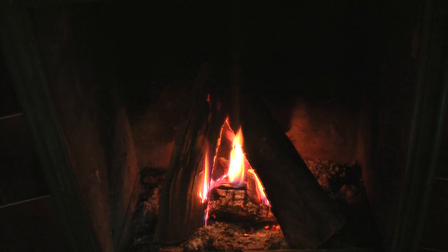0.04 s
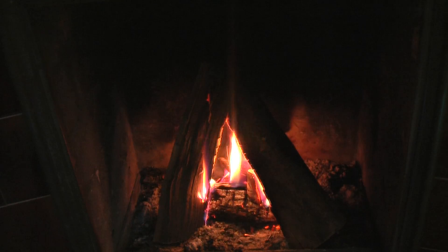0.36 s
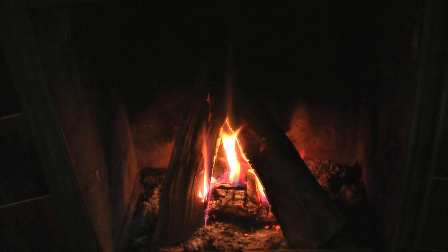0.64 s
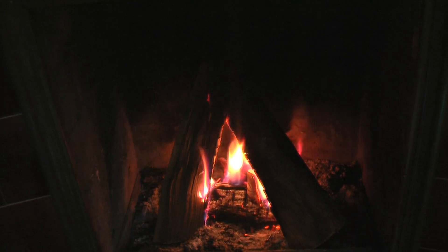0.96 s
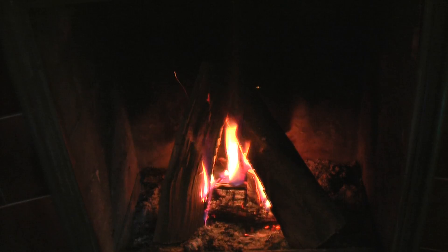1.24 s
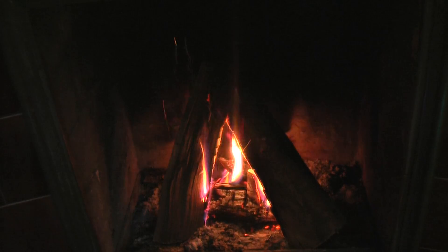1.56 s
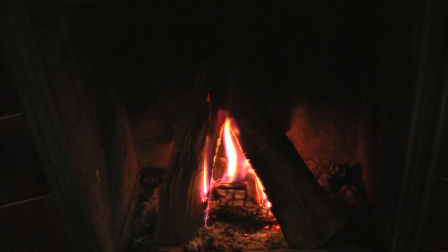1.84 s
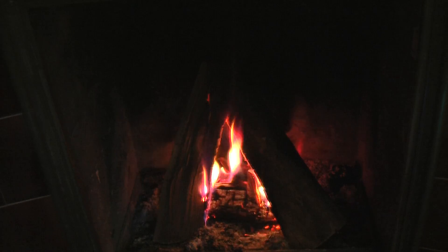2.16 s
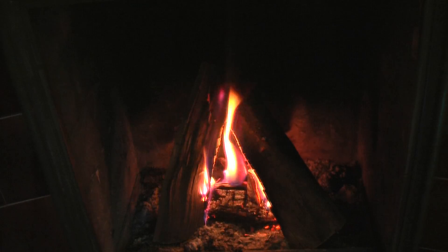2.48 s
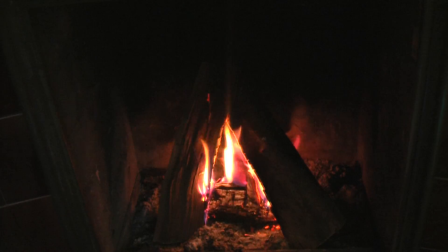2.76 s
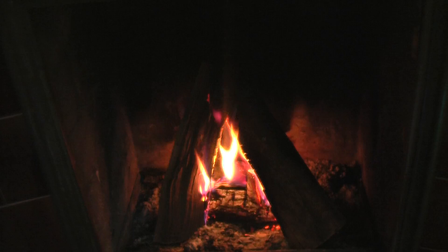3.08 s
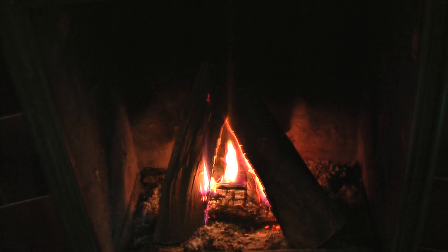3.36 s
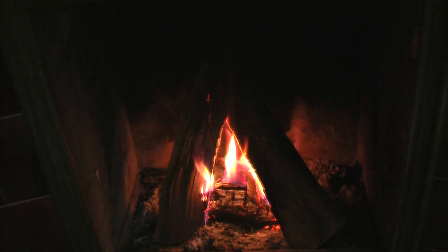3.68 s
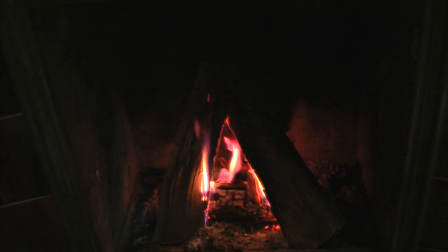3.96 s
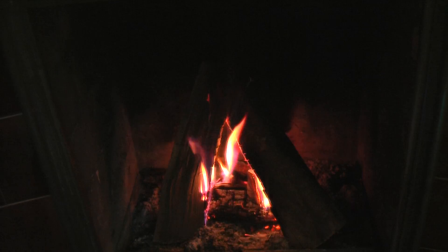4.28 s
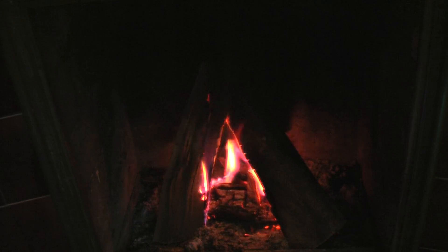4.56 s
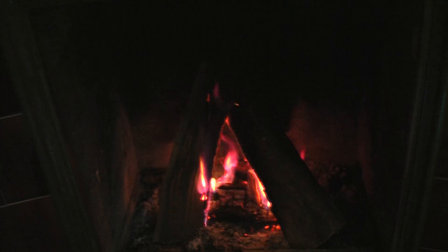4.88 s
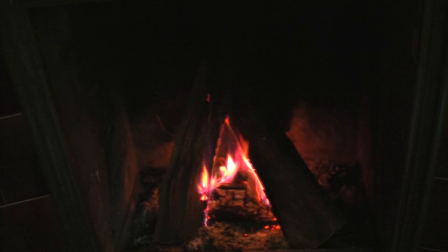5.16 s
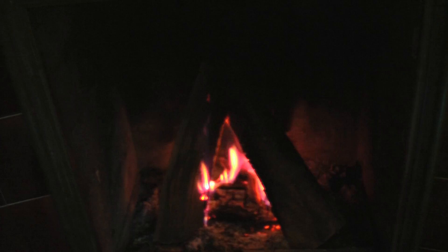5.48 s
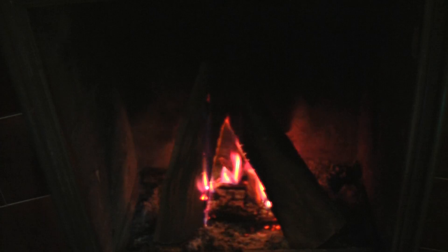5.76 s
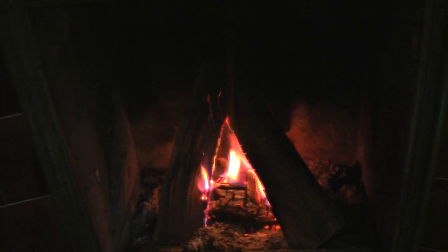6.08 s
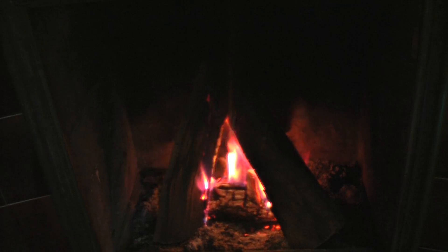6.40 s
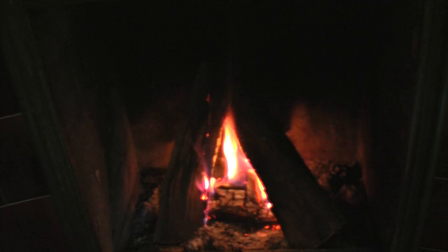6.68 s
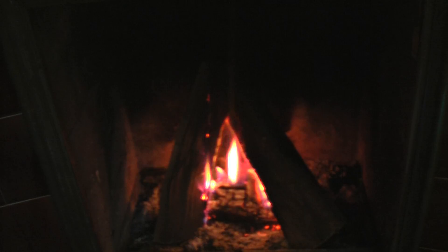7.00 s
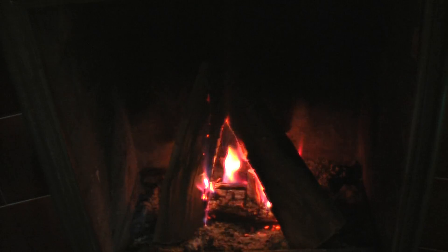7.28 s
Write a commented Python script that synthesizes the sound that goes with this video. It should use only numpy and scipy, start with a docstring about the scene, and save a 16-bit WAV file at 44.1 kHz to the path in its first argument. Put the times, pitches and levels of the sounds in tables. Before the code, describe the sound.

A close wood fire crackles unevenly in an indoor hearth, starting with thin, high spits of steam. Dry pops, small charcoal ticks and short puffs of hiss follow, with a dull knock early and another just past halfway as the logs settle. After a quieter stretch the snapping and sizzling pick up again. A soft low draught runs throughout, and an engine far outside hums faintly in the second half.

```python
"""A quiet room with logs burning in an open brick fireplace.
Pockets of gas swell and burst in the wood, charcoal ticks, and cracks hiss between the pops.
Steam squeaks and whistles out of tiny pores; now and then a log thumps as it shifts.
Underneath lie the murmur of the draught, two faint tones and an engine droning far outside."""
import sys
import numpy as np
from scipy import signal
from scipy.fft import rfft, irfft, next_fast_len
from scipy.io import wavfile

SR = 44100
rng = np.random.default_rng(int(sys.argv[2]) if len(sys.argv) > 2 else 0)


def log_audio(samples):
    """Write samples as a 16-bit WAV file to the path given in sys.argv[1]."""
    # one column per channel
    frames = np.atleast_2d(samples).T
    # limit to full scale, then quantise
    limited = np.clip(frames, -1, 1)
    pcm = np.round(limited * 32767).astype(np.int16)
    wavfile.write(sys.argv[1], SR, pcm)


N = 323694
TIME = np.arange(N) / SR

# bursting gas pockets; the last three columns are relative to the level:
# (time [s], level [dB], nominal cavity pitch [Hz], low knock [dB], high snap [dB], lead-in hiss [dB])
GAS_POPS = [(0.2946, -35.5, 2000, -5.5, -25, -23), (0.312, -45, 2650, -0.5, -7, -10),
            (0.5885, -41.5, 1930, -5, -2, -24), (0.7201, -38, 1690, -24, -13, -32),
            (1.1275, -42.5, 1140, -3, -11, -24), (1.1552, -50.5, 2100, 3.5, -4, 1),
            (1.1854, -40, 1590, -13, -9, -21), (1.2046, -50.5, 1600, -4, 4, 8.5),
            (1.212, -43.5, 3770, -3, -8, -9), (1.2383, -52, 1250, -22, 2, 10),
            (1.2892, -37, 1070, 5, -2, -33), (1.5056, -40.5, 4600, -7, -28, -3.5),
            (1.5151, -39, 1110, -4.5, -27, -27), (1.5217, -43, 3870, -4, -9, 4.5),
            (1.5447, -47.5, 1570, 1, -26, -15), (1.5588, -41, 4300, -5, -19, -8),
            (1.5638, -36, 4400, -18, -21, -18), (1.5888, -37, 3950, -10, -7.5, -6),
            (1.741, -37.5, 2670, -16, -15, -17), (1.7419, -34.5, 4500, -14, -19, -7),
            (1.803, -42.5, 3580, -5, -18, -13), (1.8147, -36, 4030, -9.5, -19, -6.5),
            (1.857, -41.5, 3720, -11, -28, 2), (1.8836, -35.5, 2210, -21, -12, -6),
            (1.895, -32.5, 1870, -18, -16, -6), (2.026, -26, 2430, -14.5, -13.5, -40),
            (2.4135, -44.5, 3640, -9.5, -30, 4), (2.796, -50, 2620, -29, -21, -12),
            (2.8048, -41.5, 1930, -11, -26, -14), (2.8167, -54, 1800, 6.5, -10, -1),
            (3.1416, -56, 4430, -3, -1, -20), (3.2447, -45, 2200, -4, -19, -8),
            (3.2615, -45, 1460, -3, -11, -6), (3.351, -58.5, 2580, -12, 0, 2),
            (3.3591, -54, 3130, 0.5, -5, 3.5), (3.4079, -63, 4230, -15, 8, -17),
            (3.634, -49, 2120, 0.5, -25, -0.5), (3.7805, -52, 2570, 2.5, -9, -1.5),
            (3.828, -64, 1400, 5, 0, -16), (3.86, -65, 3200, -9, 1, -17), (3.979, -58, 2300, -11, -5, -1),
            (3.9983, -50.5, 2270, -1, -14, -2), (4.043, -51, 2000, -6, -16, -7),
            (4.066, -53, 3300, -4, -10, -3), (4.085, -54, 3200, -6, -7, -5),
            (4.105, -48.5, 2980, -8, -4, -4), (4.1394, -45, 1400, -1.5, -10, -17),
            (4.3437, -34, 2780, -7, -12, -3.5), (4.3448, -30, 4750, -16, -11.5, -9),
            (4.51, -64, 1700, 11.5, -14, -12), (4.7561, -62.5, 4690, -4, 5, -16),
            (4.7736, -54.5, 1250, -1, -6, -11), (4.8456, -58.5, 3300, -13, -6, -10),
            (4.9135, -48, 1490, 0.5, -25, -30), (4.949, -47, 1100, -2.5, -4.5, -1),
            (5.0196, -41, 1270, -6, -8, -33), (5.0493, -37, 5530, -8.5, 1.5, -35),
            (5.177, -38, 1210, -6, -13, -12), (5.5559, -43.5, 1370, -11, -4, -1),
            (5.567, -37, 2050, -10, -3, -9), (5.5838, -48, 1940, -15, -10, 10.5),
            (5.8545, -33, 1780, -12, -11, -15), (5.8559, -27, 2350, -22, -12, -25),
            (6.0447, -39.5, 1990, -8.5, -3, -22), (6.0499, -42, 2300, -4.5, 2, -30),
            (6.353, -54, 4500, -14, -4, -10), (6.4114, -53, 4360, -8, -9, -7),
            (6.8434, -50.5, 4360, -18, -3, -4), (7.0931, -30, 5610, -9.5, -4, -37)]
# steam squeaks: (time [s], level [dB], pitch [Hz], decay [s])
STEAM_SQUEAKS = [(0.0835, -36.5, 9500, 0.0019), (0.1445, -38, 9400, 0.0019), (0.1776, -40, 9470, 0.0021),
                 (0.2192, -19, 9550, 0.0023), (0.233, -22.5, 9400, 0.0017), (0.235, -21, 9300, 0.0011),
                 (0.2444, -29, 9550, 0.0013), (0.2735, -19, 9550, 0.0026), (0.3023, -37, 9700, 0.003),
                 (0.325, -31.5, 9700, 0.0016), (0.3306, -34, 10100, 0.0031), (0.34, -38, 9300, 0.0029),
                 (0.3798, -26, 9500, 0.002), (0.4445, -43.5, 9870, 0.0054), (0.69, -27, 9430, 0.0029),
                 (0.7072, -28.5, 9450, 0.0035), (0.7354, -60, 9600, 0.0052), (0.783, -42.5, 9450, 0.0048),
                 (0.8157, -47.5, 9540, 0.0092), (0.894, -45, 9100, 0.0029), (0.912, -36, 9600, 0.0024),
                 (0.956, -43, 10620, 0.0024), (0.976, -46, 10500, 0.0036), (6.091, -34.5, 9460, 0.0056),
                 (6.0999, -42, 9430, 0.0023), (6.1257, -33, 9940, 0.0057), (6.171, -35, 9780, 0.0078),
                 (6.1867, -48, 9810, 0.0034), (6.96, -38.5, 9400, 0.0021), (7.1932, -29.5, 9300, 0.0032),
                 (7.2814, -29, 9390, 0.0015), (7.308, -30.5, 9500, 0.0046), (7.3176, -40, 9300, 0.0041)]
# shifting logs: (time [s], level [dB], pitch [Hz], decay [s], room send [dB])
LOG_THUMPS = [(.588, -32, 326, 0.0041, -10), (1.289, -16.5, 297, 0.0022, -3.5),
              (2.026, -32.5, 497, 0.0005, 8), (2.448, -45, 296, 0.0038, 1.5), (3.078, -47, 262, 0.006, -5),
              (3.309, -46.5, 250, 0.0062, -20), (3.509, -44.5, 195, 0.0079, -8),
              (4.139, -44, 258, 0.0015, -2), (4.346, -25.5, 450, 0.0038, -11),
              (4.351, -25.5, 69.6, 0.0065, -20), (4.387, -20.5, 63, 0.0037, -23),
              (4.688, -44, 225, 0.016, -6.5), (4.717, -51.5, 260, 0.0069, -6),
              (7.093, -35, 573, 0.00093, 5.5)]
# jets from cracks:
# (time fully open [s], rise [s], hold [s], fall [s], blowing [dB], hiss [dB], fizz [dB], hiss pitch [Hz])
GAS_JETS = [(0.0, .01, 0.022, 0.13, -57, -54.5, -52.5, 4900),
            (.52, 0.032, 0.078, 0.01, -54.5, -51.5, -54, 4500),
            (1.191, 0.017, 0.02, 0.016, -53.5, -55, -59, 4450),
            (1.287, 0.0092, 0.025, 0.063, -63, -55, -58, 4600),
            (1.552, .02, 0.081, 0.048, -65, -71, -65, 4300), (1.89, .02, .01, 0.051, -76, -58, -59, 4100),
            (2.031, 0.0018, 0.054, 0.072, -50.5, -40.5, -58, 4350),
            (2.404, 0.025, 0.06, 0.027, -61, -60.5, -81, 3500),
            (2.794, 0.012, 0.014, 0.027, -53, -54, -68, 3280),
            (3.24, 0.017, 0.016, 0.01, -61, -62, -80, 3600),
            (3.752, .02, 0.013, 0.011, -67.5, -70, -87, 3900),
            (4.043, 0.048, 0.052, 0.038, -64, -60, -74, 4220),
            (4.345, 0.051, 0.029, 0.086, -58, -63, -67.5, 4930),
            (4.944, .006, .015, 0.036, -58, -57, -63, 4800),
            (5.057, .006, 0.057, 0.027, -62, -54.5, -58.5, 5000),
            (5.143, .015, 0.0072, 0.0057, -57, -49.5, -51, 5000),
            (5.362, 0.026, 0.018, .035, -49, -56, -57.5, 4840),
            (5.502, 0.018, .01, 0.019, -61, -49.5, -49, 4970),
            (5.621, 0.034, 0.054, 0.072, -58.5, -55, -63, 3670),
            (5.765, 0.017, 0.067, .02, -78, -52.5, -55.5, 4870),
            (5.937, 0.015, 0.031, 0.032, -70, -58, -57.5, 4800),
            (6.064, 0.052, 0.02, 0.029, -68, -51, -79, 3470),
            (6.269, 0.09, 0.18, 0.055, -58, -60, -69, 4240),
            (6.359, 0.039, .02, 0.036, -76, -56, -62.5, 4400),
            (6.529, 0.014, 0.022, 0.023, -57.5, -55.5, -56.5, 5060),
            (6.667, .02, 0.015, 0.036, -63, -53.5, -58, 5870),
            (6.774, 0.034, .05, 0.012, -57.5, -54, -62.5, 6000),
            (7.099, 0.0035, 0.043, 0.072, -59, -51, -48, 5200)]
# envelope of the seeping gas: (time [s], blowing [dB], hiss [dB])
SEEP_LEVELS = [(0, -51.5, -50), (.35, -54.5, -53), (.75, -58, -56), (.9, -62, -69), (1.08, -58, -65.5),
               (1.22, -61.5, -58.5), (1.45, -76, -70), (2.0, -73, -72), (2.6, -87, -80.5),
               (4.6, -80.5, -85.5), (4.88, -77, -74), (5.05, -65.5, -70), (5.35, -60.5, -60),
               (5.7, -58.5, -56.5), (6.03, -61, -55.5), (6.17, -64.5, -67), (6.9, -65.5, -61),
               (7.34, -46.5, -44)]
# blows through one whistling pore: (time [s], length [s], level [dB])
PORE_WHISTLES = [(0.905, 0.051, -41.5), (0.961, 0.083, -46), (1.104, 0.048, -47)]
# engine speed: (time [s], firing rate [Hz])
ENGINE_RATE = [(2.6, 40.6), (3.3, 40.2), (4.2, 40.0), (4.6, 40), (5.2, 39.16), (5.8, 38.22), (6.1, 37.74),
               (7.3, 37.48)]
# engine fade: (time [s], level [dB])
ENGINE_FADE = [(2.5, -87), (3.3, -75), (4.0, -66.5), (4.7, -66.5), (5.5, -64.5), (6.05, -66), (6.45, -64.5),
               (7.3, -65.5)]
# engine harmonics: (order [x firing rate], level [dB])
ENGINE_HARMONICS = [(2, 0), (3, -0.5), (4, 0), (5, 0), (6, -3)]
# swells of single harmonics: (peak time [s], half width [s], order [x firing rate], boost [dB])
HARMONIC_SWELLS = [(4.87, 0.26, 4, 14), (5.25, 0.24, 3, 6), (5.553, 0.23, 6, 8), (6.371, .22, 6, 9.5),
                   (6.553, 0.38, 2, 10), (6.644, 0.16, 5, 7.5), (6.754, 0.39, 3, 11), (7.195, 0.53, 6, 9.5)]
# thin tones behind the fire: (pitch [Hz], level [dB])
BACKGROUND_TONES = [(2702, -88.5), (3919, -89)]
# reverb of the room: (frequency [Hz], time to fall by 60 dB [s])
ROOM_DECAY = [(100, 0.3), (400, 0.48), (1500, 0.35), (5000, 0.24), (10000, 0.21), (16000, 0.74)]

# tone colours: (frequency [Hz], level [dB])
CRACK_COLOUR = [(300, -20.5), (900, -5.5), (1800, -1), (3200, -4.5), (5000, -4.5), (6500, -9), (8000, -19),
                (16000, -8.5)]  # mid-range bite of splitting wood
KNOCK_COLOUR = [(40, -46), (130, 7), (300, 4), (600, 2), (900, 7), (1600, -35), (5000, -49)]  # low body of a pop
SNAP_COLOUR = [(3000, -45), (6500, -1.5), (8000, 6), (10000, 11), (13000, 10), (16500, 4.5)]  # bright edge of a pop
BLOWING_COLOUR = [(120, -50), (300, -8), (550, -4), (1000, 3), (1700, 3), (2400, 0.5), (3200, -5.5),
                  (6000, -44)]  # gas in wide cracks
HISS_COLOUR = [(1500, -32), (2500, 4.5), (3100, 1.5), (4200, -5), (5400, -3), (6400, 0.5), (7500, -13),
               (11000, -3.5)]  # gas in narrow cracks
FIZZ_COLOUR = [(4000, -5), (7000, -3), (8300, 0.5), (9600, 6.5), (11000, 2), (13000, 1.5), (16000, -3),
               (17000, -2.5)]  # gas in the finest cracks
DRAUGHT_COLOUR = [(15, -28), (28, -13), (40, -12), (50, -6), (65, -0.5), (160, -0.5), (240, -5.5),
                  (380, -8.5), (500, -16), (850, -17.5), (1700, -23.5), (4000, -32.5), (8000, -45),
                  (16500, -43)]  # flames and chimney
SPIT_COLOUR = [(6500, -56), (8500, -13), (9700, -3), (11000, 11), (13000, 1), (16000, -27)]
THUMP_COLOUR = [(30, 5), (100, 10), (300, 10), (750, 3), (1000, -1), (3000, -61)]
TICK_COLOUR = [(500, -23), (3000, -4), (16000, 11)]


def pops(overtone_ratio=2.086, glide_s=0.0086, swell_s=0.0034, leak_s=0.01, size=3000):
    """Gas leaks ever faster from a pocket; the wood cracks, and the cavity rings lower as it opens."""
    out, t = np.zeros(N), np.arange(size) / SR
    knock, snap = impulse(KNOCK_COLOUR), impulse(SNAP_COLOUR)
    for start, db, hz, knock_db, snap_db, leak_db in GAS_POPS:
        crack = lowpass(impulse(CRACK_COLOUR, hz, focus_db=3), 9500, order=2)
        phase = phase_of(hz * (0.25 + 0.817 * np.exp(-t / glide_s)))
        overtone = amp(-4 + read(CRACK_COLOUR, overtone_ratio * hz))  # wood swallows high overtones
        cavity = (np.sin(phase) + overtone * np.sin(overtone_ratio * phase)) * np.exp(-t / 0.0013)
        cavity = lowpass(cavity, 6800, order=4)
        add(out, start, amp(db - 2) * burst(crack, decay_s=0.0013, tearing=4.7))
        add(out, start, amp(db - 3) * burst(cavity, decay_s=0.00053, tearing=0.87))
        add(out, start, amp(db + knock_db - 1) * burst(knock, decay_s=0.0067, tearing=0.82))
        add(out, start, amp(db + snap_db - 1) * burst(snap, decay_s=0.0036, tearing=0.95))
        leak = signal.fftconvolve(rng.standard_normal(size), crack)[:size]
        leak *= (np.exp(-t / swell_s) + amp(-13) * np.exp(-t / leak_s))[::-1]  # swells into the pop
        add(out, start - size / SR, 0.3 * amp(db + leak_db - 1) * unit(leak))
    return out


def squeaks(upper_ratio=1.075, attack_s=0.00024, follow_s=0.021, spit_db=-11, size=2000):
    """A sap bubble opens a pore that rings at two pitches over a spit of steam; smaller ones follow."""
    out, t = np.zeros(N), np.arange(size) / SR
    spit_response = impulse(SPIT_COLOUR)
    for start, db, hz, decay in STEAM_SQUEAKS:
        upper_gain = amp(-9 + 1200 * (decay - 0.0064))  # stronger in pores that ring long
        followers = [(rng.uniform(0.26, 1) * follow_s, rng.normal(-15, 0.49), rng.normal(1.01, 0.0204))
                     for _ in range(3)]
        for delay, drop_db, detune in [(0.0011, 0, 1)] + followers:
            turns = hz * detune * t
            upper = upper_gain * np.sin(2 * np.pi * (upper_ratio * turns + rng.random()))
            tone = (np.sin(2 * np.pi * turns) + upper) * np.exp(-t / decay)
            spit = unit(signal.fftconvolve(rng.standard_normal(size), spit_response)[:size])
            squeak = tone + amp(spit_db) * spit * np.exp(-t / 0.0017)
            add(out, start + delay, amp(db + drop_db + 2) * squeak * (1 - np.exp(-t / attack_s)))
    return out


def thumps(push_gain=0.82, swing_gain=0.71, size=4000):
    """A log gives way with one heavily damped swing, and the room answers."""
    direct, send, t = np.zeros(N), np.zeros(N), np.arange(size) / SR
    thud = impulse(THUMP_COLOUR, size=2 * size)
    for start, db, hz, decay, send_db in LOG_THUMPS:
        push = lowpass(thud / thud.max(), min(3 * hz, 5000), order=1)  # heavier logs push more softly
        swing = np.sin(2 * np.pi * hz * t) * np.exp(-t / decay)
        low_cut = signal.butter(2, 0.39 * hz, "high", fs=SR)  # a log radiates little below its pitch
        thump = amp(db) * signal.lfilter(*low_cut, swing_gain * swing + push_gain * push)
        add(direct, start, thump)
        add(send, start, amp(send_db) * thump)
    return direct + room(send)


def gas(hiss_db=-1, fizz_db=3, flutter_db=1.5, flutter_hz=39, grain_db=1, grain_hz=500):
    """Seeping gas and jets flutter together, while blowing, hiss and fizz each sputter on their own."""
    blowing, hiss, fizz = [layer * amp(grain_db * wander(grain_hz)) for layer in seep() + jets()]
    return (blowing + amp(hiss_db) * hiss + amp(fizz_db) * fizz) * amp(flutter_db * wander(flutter_hz))


def jets(blow_hz=1990, fizz_power=1.3, size=32768):
    """A crack opens, blows for a moment and runs dry; its fizz grows and dies faster than the flow."""
    out, t = np.zeros((3, N)), (np.arange(size) - size // 4) / SR
    for open_s, rise, hold, fall, blow_db, hiss_db, fizz_db, hiss_hz in GAS_JETS:
        flow = np.exp(np.minimum(t, 0) / rise - np.maximum(t - hold, 0) / fall)
        envelopes = amp(blow_db) * flow, amp(hiss_db) * flow, amp(fizz_db) * flow ** fizz_power
        for layer, envelope, sound in zip(out, envelopes, vent(blow_hz, hiss_hz, size)):
            add(layer, open_s + t[0], (envelope * sound)[open_s + t >= 0])
    return out


def seep(fizz_db=-5.5, ember_db=-79.5):
    """Gas seeps from the logs, dies down and builds again; fizz follows the hiss over steady embers."""
    times, blow_db, hiss_db = np.transpose(SEEP_LEVELS)
    blowing, hiss = amp(np.interp(TIME, times, blow_db)), amp(np.interp(TIME, times, hiss_db))
    fizz = np.hypot(amp(fizz_db) * hiss, amp(ember_db))
    return np.array([blowing, hiss, fizz]) * vent(blow_hz=1666, hiss_hz=4600, size=N)


def vent(blow_hz, hiss_hz, size, top_hz=8500):
    """Gas blows, hisses and fizzes in wide, narrow and fine cracks; the first two resonate."""
    blow_tone = unit(resonate(noise(BLOWING_COLOUR, size), blow_hz, width_hz=1200))
    hiss_tone = unit(resonate(noise(HISS_COLOUR, size), hiss_hz, width_hz=2100))
    blowing = lowpass(noise(BLOWING_COLOUR, size) + 0.85 * blow_tone, top_hz, order=3)
    hiss = lowpass(noise(HISS_COLOUR, size) + hiss_tone, top_hz, order=3)
    return unit(blowing), unit(hiss), noise(FIZZ_COLOUR, size)


def whistles(pitch_hz=16200, waver_hz=45, sizzle_hz=9650, sizzle_db=-9):
    """A narrow pore sings in short, fading blows over a thin sizzle."""
    envelope = np.zeros(N)
    for start, length, db in PORE_WHISTLES:
        progress = np.linspace(0, 1, round(length * SR))
        add(envelope, start, amp(db) * np.minimum(progress * 10, 1) * (1 - progress))
    sizzle = unit(resonate(rng.standard_normal(N), sizzle_hz, width_hz=700))
    tone = np.sin(phase_of(pitch_hz + waver_hz * wander(rate_hz=150)))
    return envelope * (tone + amp(sizzle_db) * sizzle)


def ticks(per_s=28, level_db=-73, spread_db=3, spots=12):
    """Tiny splits in the charcoal, each spot with its own colour."""
    out = np.zeros(N)
    for hz in np.geomspace(3500, 14000, spots):
        strengths = amp(spread_db * np.minimum(rng.exponential(1, N), 3))
        triggers = rng.random(N) < per_s / spots / SR
        split = burst(impulse(TICK_COLOUR, hz, focus_db=11.5), decay_s=0.00043, tearing=1)
        out += signal.oaconvolve(strengths * triggers, split)[:N]
    return amp(level_db) * out


def draught(level_db=-62):
    """The low, steady murmur of flames and chimney."""
    return amp(level_db) * noise(DRAUGHT_COLOUR)


def engine(waver_db=1.9):
    """A far engine fades in and slowly sinks in pitch; its low harmonics swell in turn."""
    phase = phase_of(np.interp(TIME, *np.transpose(ENGINE_RATE)))
    fade_db = np.interp(TIME, *np.transpose(ENGINE_FADE))
    drone = np.zeros(N)
    for order, db in ENGINE_HARMONICS:
        swell_db = sum(boost * np.exp(-((TIME - peak_s) / width) ** 2)
                       for peak_s, width, swelling, boost in HARMONIC_SWELLS if swelling == order)
        gain = amp(fade_db + db + swell_db + waver_db * wander(rate_hz=3))
        drone += gain * np.sin(order * phase + 2 * np.pi * rng.random())
    return np.sqrt(2) * drone


def faint_tones(waver_db=3, drift_hz=6):
    """Thin wavering tones that peek through only when the fire is quiet."""
    out = np.zeros(N)
    for hz, db in BACKGROUND_TONES:
        gain = amp(db + waver_db * wander(rate_hz=4))
        out += gain * np.sin(phase_of(hz + drift_hz * wander(rate_hz=4)))
    return np.sqrt(2) * out


def firebox(x, predelay_s=0.0018, decay_s=0.0043, top_hz=1400, size=1500):
    """Close brick walls throw back a short, dull cluster of echoes."""
    t = np.arange(size) / SR
    echoes = rng.standard_normal(size) * np.exp(-t / decay_s) * (t > predelay_s)
    return signal.oaconvolve(x, lowpass(echoes / np.linalg.norm(echoes), top_hz, order=1))[:N]


def room(x, reflections=2400, size=24000):
    """Room reverb: sparse reflections of random sign, each band dying at its own speed."""
    taps = np.zeros(size)
    taps[rng.integers(size // 100, size, reflections)] = rng.choice([-1., 1.], reflections)
    hz, t, bands = signal.stft(taps, SR, nperseg=256)
    tail = signal.istft(bands * amp(-60 * t / read(ROOM_DECAY, hz)[:, None]), SR)[1]
    return signal.fftconvolve(x, tail / np.linalg.norm(tail))[:N]


def burst(response, decay_s, tearing, size=1500):
    """One sharp break and the fibres that tear after it, with the energy of 5 ms at rms 1."""
    t = np.arange(size) / SR
    drive = tearing * unit(rng.standard_normal(size) * np.exp(-t / decay_s)) / np.sqrt(size)
    drive[0] += 1
    sound = signal.fftconvolve(drive, response)
    return sound / np.linalg.norm(sound) * np.sqrt(.005 * SR)


def impulse(colour, centre_hz=2000, focus_db=0, size=1024):
    """Minimum-phase click of a colour, rolled off by focus_db an octave either side of a centre."""
    hz = abs(np.fft.fftfreq(size, 1 / SR))
    log_gain = np.log(amp(read(colour, hz) - focus_db * abs(np.log2((hz + 1) / centre_hz))))
    return np.fft.ifft(np.exp(np.conj(signal.hilbert(log_gain)))).real[:size // 2]


def noise(colour, size=N):
    """Steady coloured noise of rms 1."""
    n = next_fast_len(size, True)
    gain = amp(read(colour, np.fft.rfftfreq(n, 1 / SR)))
    return unit(irfft(rfft(rng.standard_normal(n)) * gain, n)[:size])


def wander(rate_hz, size=N):
    """Smooth random modulation of rms 1."""
    n = next_fast_len(size, True)
    rolloff = 1 + (np.fft.rfftfreq(n, 1 / SR) / rate_hz) ** 2
    return unit(irfft(rfft(rng.standard_normal(n)) / rolloff, n)[:size])


def resonate(x, hz, width_hz):
    """A resonance at hz: shift down to zero, smooth twice, shift back."""
    carrier = np.exp(1j * phase_of(np.full(len(x), hz)))
    pole = np.exp(-np.pi * width_hz / SR)
    return 2 * (carrier * signal.lfilter([(1 - pole) ** 2], [1, -2 * pole, pole ** 2], x / carrier)).real


def lowpass(x, hz, order):
    """Rolls off the top above hz."""
    return signal.lfilter(*signal.butter(order, hz, fs=SR), x)


def phase_of(hz):
    """Running phase of a pitch curve, in radians."""
    return 2 * np.pi * np.cumsum(hz) / SR


def read(points, hz):
    """Reads a table on a log-frequency axis."""
    frequencies, values = np.transpose(points)
    return np.interp(np.log(hz + 1), np.log(frequencies + 1), values)


def add(mix, start_s, sound):
    """Drops a sound into the mix."""
    part = mix[max(round(start_s * SR), 0):][:len(sound)]
    part += sound[:len(part)]


def amp(db):
    """Decibels to gain."""
    return 10 ** (np.asarray(db) / 20)


def unit(x):
    """Scales to rms 1."""
    return x / np.sqrt(np.mean(x ** 2) + 1e-20)


def scene(firebox_db=-13, crackle_send_db=-15, steam_send_db=-9):
    """Mono mix of the fire, its echoes and the quiet bed behind it."""
    crackle, steam = pops() + ticks(), squeaks()
    echoes = amp(firebox_db) * firebox(crackle)
    echoes += room(amp(crackle_send_db) * crackle + amp(steam_send_db) * steam)
    fire = crackle + steam + whistles() + gas() + thumps()
    bed = draught() + engine() + faint_tones()
    return (fire + echoes + bed)[None]


def record(dry, cutoff_hz=16750):
    """A steep high cut on the whole mix."""
    high_cut = signal.firwin(255, cutoff_hz, window=("kaiser", 8), fs=SR)
    return signal.oaconvolve(dry, high_cut[None], "same")


dry = scene()
out = record(dry)
log_audio(out)
```